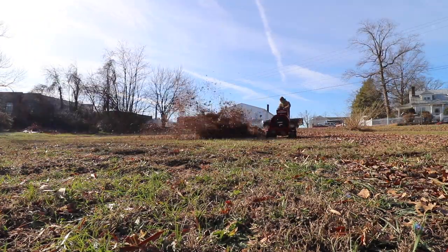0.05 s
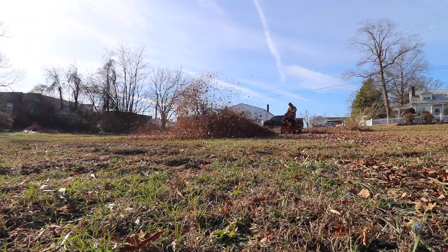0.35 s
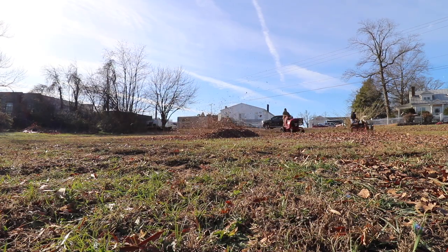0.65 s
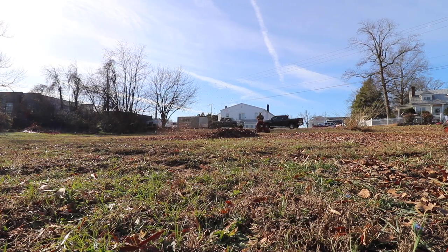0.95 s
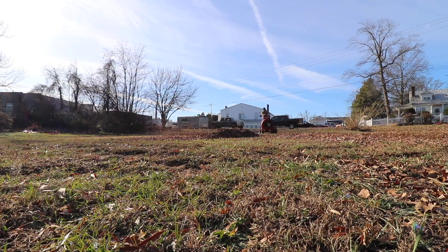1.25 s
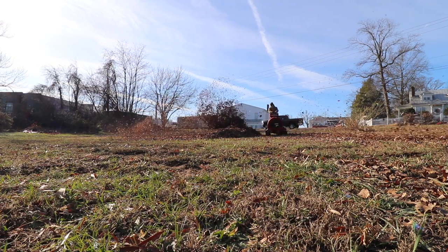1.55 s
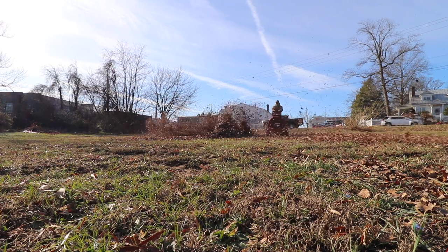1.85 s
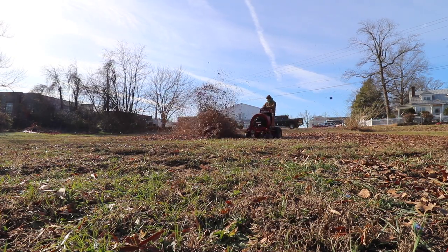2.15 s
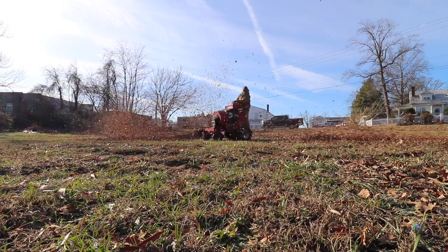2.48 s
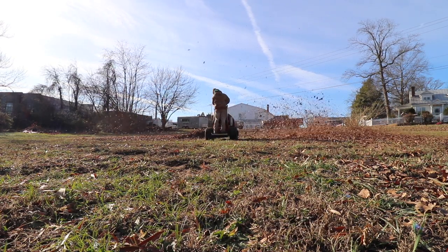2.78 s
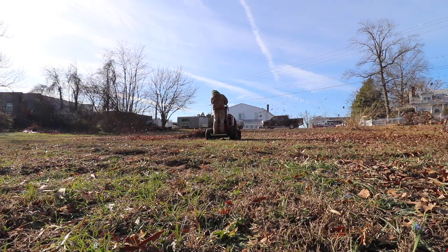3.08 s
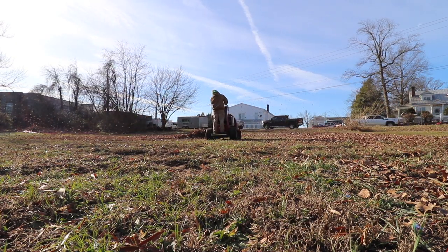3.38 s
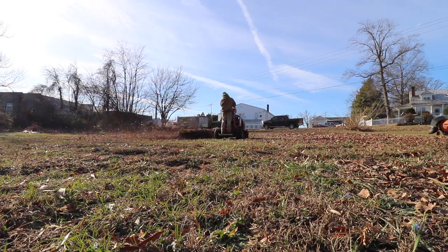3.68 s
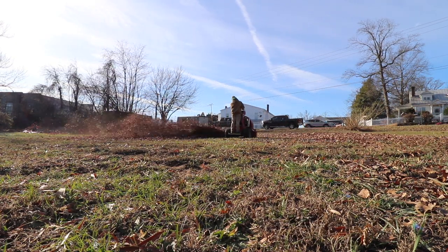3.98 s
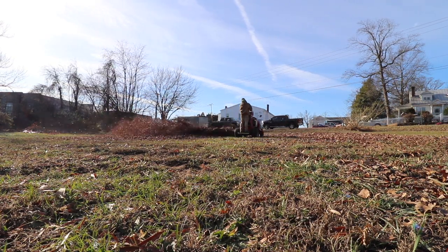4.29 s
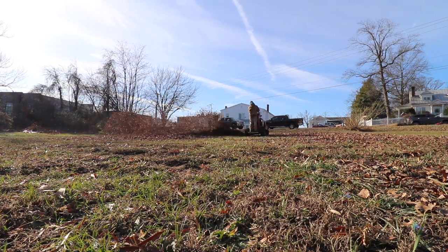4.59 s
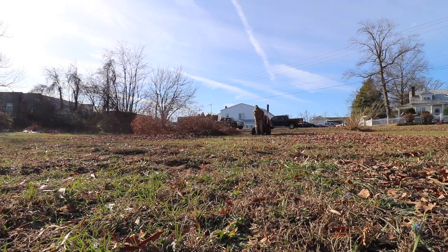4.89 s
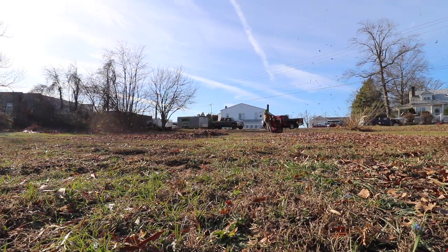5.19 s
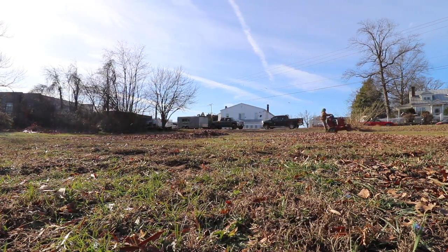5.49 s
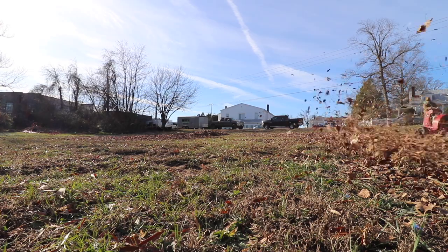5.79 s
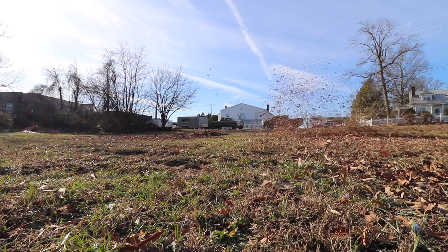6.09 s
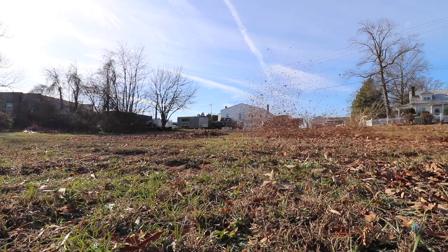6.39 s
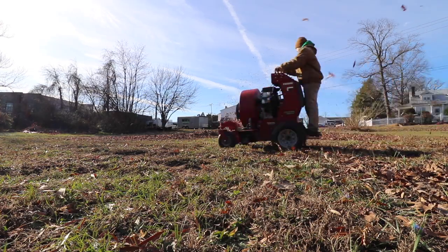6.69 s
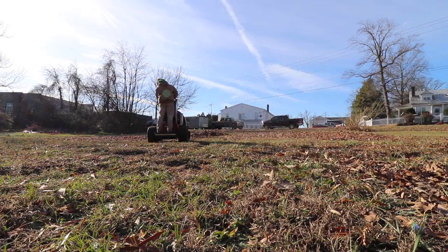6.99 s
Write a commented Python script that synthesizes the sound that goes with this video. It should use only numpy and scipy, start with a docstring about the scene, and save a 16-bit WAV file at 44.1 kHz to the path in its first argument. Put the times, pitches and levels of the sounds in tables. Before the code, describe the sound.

Two powerful leaf blowers run steadily in an open field, their high fan whines rising and falling in loudness over a hissing roar.

```python
"""In an open field, a stand-on leaf blower works at full throttle while a second whines at a higher pitch.
Each impeller radiates a tone at its blade-passing frequency; the first machine also hums and buzzes at
harmonics of its rotation rate, and the second engine drones. The turbulent jets roar, pulsing with each
turn of the first impeller, and dry leaves hiss in the blast. Being directional, the whines swell and fade
as the machines swing round, and an automatic gain control ducks everything else under them."""
import sys
import numpy as np
from scipy import signal
from scipy.io import wavfile
from scipy.ndimage import minimum_filter1d

SR = 44100
rng = np.random.default_rng(int(sys.argv[2]) if len(sys.argv) > 2 else 0)


def pcm_store(signal):
    """Save signal as 16-bit PCM."""
    levels = np.round(np.clip(np.atleast_2d(signal), -1, 1) * 32767)
    wavfile.write(sys.argv[1], SR, levels.astype(np.int16).T)


N = 310905
BLADES = 12   # on the main impeller

# blade-passing frequency of the second fan: t/s, f/Hz
SECOND_FAN_PITCH = [(0.0, 2493), (0.31, 2467.4), (0.71, 2498), (0.78, 2497), (1.88, 2542), (2.0, 2437.5),
                    (2.17, 2494.9), (2.32, 2475.7), (3.03, 2484), (3.19, 2538), (3.52, 2525),
                    (3.67, 2535.1), (3.79, 2484), (3.94, 2513), (4.11, 2468), (4.87, 2522), (5.41, 2497),
                    (5.71, 2535), (5.83, 2479), (6.44, 2513), (6.53, 2549.6), (7.04, 2512)]


def from_db(db):
    """Amplitude ratio for a level in decibels."""
    return 10 ** (np.asarray(db) / 20)


def unit_rms(x):
    """Normalisation to unit mean-square value."""
    return x / np.sqrt(np.mean(x ** 2) + 1e-20)


def in_time(rows):
    """Linear interpolation in time: one curve for each column after t/s."""
    times, *columns = np.transpose(rows)
    return [np.interp(np.arange(N) / SR, times, column) for column in columns]


def at_hz(points, hz):
    """Interpolation of a spectrum on a logarithmic frequency axis."""
    freqs, values = np.transpose(points)
    return np.interp(np.log(hz), np.log(freqs), values)


def drift(corner_hz):
    """Random fluctuation of unit RMS: white noise through a two-pole low-pass."""
    step, settling = 40, 2000   # samples per control point; points dropped while the filter settles
    pole = np.exp(-2 * np.pi * corner_hz * step / SR)
    white = rng.standard_normal(N // step + settling + 2)
    slow = signal.lfilter([1], [1, -2 * pole, pole * pole], white)[settling:]
    return np.interp(np.arange(N) / step, np.arange(len(slow)), unit_rms(slow))


def phase_of(hz):
    """Phase as the time integral of frequency."""
    return 2 * np.pi * np.cumsum(hz) / SR


def tone(phase, level_db, scatter, rate_hz):
    """Scattering by moving air: a steady wave plus a part of random amplitude and phase."""
    in_phase = (1 + scatter * drift(rate_hz)) * np.sin(phase)
    quadrature = scatter * drift(rate_hz) * np.cos(phase)
    return from_db(level_db) * unit_rms(in_phase + quadrature)


def main_rotation():
    """Frequency modulation: the main impeller's angle, as load slows it and jolts set it warbling."""
    # blade-passing frequency, sagging and recovering under load: t/s, f/Hz
    pitch = [(0, 2001), (0.76, 2008), (1.0, 2086), (1.13, 2012), (1.35, 2089), (2.4, 2077), (2.5, 2010),
             (2.63, 1977), (2.78, 1995), (2.9, 2086), (3.03, 2109), (3.13, 2047), (3.27, 2094),
             (3.55, 2120), (3.66, 2087), (4.05, 2113), (4.6, 2095), (4.8, 2117), (4.86, 2060), (4.99, 2061),
             (5.15, 2084), (5.4, 2086), (5.48, 2045), (5.58, 2043), (5.75, 2130), (5.85, 2080),
             (6.02, 2040), (6.12, 2066), (6.2, 2042), (6.6, 2047), (6.72, 2018), (7.05, 1992)]
    # damped oscillations of that frequency: onset t/s, deviation f/Hz, decay time t/s
    jolts = [(4.843, 23.3, 0.53), (5.428, 19, 0.14)]
    blade_hz, = in_time(pitch)
    warble, warble_rate_hz = 0, 15.4
    for start, depth_hz, decay in jolts:
        age = np.maximum(np.arange(N) / SR - start, 0)
        warble -= depth_hz * np.exp(-age / decay) * np.sin(2 * np.pi * warble_rate_hz * age)
    return phase_of((blade_hz + warble + 2.0 * drift(18.6)) / BLADES)


def main_whine(rotation):
    """Blade-passing tone: each blade sends out a pressure pulse as it passes the housing's lip."""
    # fundamental, as the fan faces to and fro: t/s, level/dB
    fundamental = [(0, -26.5), (0.54, -35), (0.6, -22.5), (0.94, -24), (0.99, -42), (1.28, -26.5),
                   (1.75, -42), (2.01, -39), (2.06, -25), (2.47, -25), (2.51, -8), (2.71, -9), (2.765, -25),
                   (2.83, -10.5), (3.04, -9.5), (3.15, -16), (3.59, -23), (4.25, -20), (4.82, -26.5),
                   (4.86, -16), (5.15, -13.5), (5.57, -19.5), (5.68, -32), (5.8, -33), (5.84, -19.5),
                   (6.15, -21.5), (6.31, -37), (6.42, -25.5), (6.66, -20), (6.87, -26), (7.04, -11.5)]
    # second harmonic, beamed more narrowly: t/s, level/dB
    octave = [(0, -31), (0.15, -27), (0.4, -33), (0.9, -37.5), (1.07, -32.5), (2.05, -30.5), (2.46, -49),
              (2.53, -19.5), (2.79, -20.5), (2.87, -34), (3.5, -42), (5.1, -30.5), (5.5, -41), (5.8, -26),
              (5.95, -37), (6.4, -27.5), (6.46, -42), (6.87, -37), (6.94, -20.5), (7.05, -28)]
    # third harmonic: t/s, level/dB
    third = [(0, -45), (1.9, -44), (2.4, -39.5), (3.0, -37.5), (3.25, -45), (4.3, -46.5), (5.7, -85),
             (6.3, -46), (6.8, -44), (6.95, -37)]
    first_db, second_db, third_db = in_time(fundamental) + in_time(octave) + in_time(third)
    blade_phase = BLADES * rotation
    out = tone(blade_phase, first_db + .2, scatter=.04, rate_hz=25)
    out += tone(2 * blade_phase, second_db, scatter=.18, rate_hz=25)
    out += tone(3 * blade_phase, third_db, scatter=.47, rate_hz=12)
    return out + tone(4 * blade_phase, third_db - 14, scatter=.6, rate_hz=30)


def machine_hum(rotation):
    """Harmonic series on the rotation rate; the higher orders fade in and out more as the machine moves."""
    # common envelope of the harmonics: t/s, level/dB
    envelope = [(0, -33.5), (0.53, -35), (0.77, -39), (0.9, -35), (1.8, -37), (2.6, -36.5), (3.3, -33.5),
                (4.7, -32.5), (5.4, -31.5), (5.8, -38), (6.15, -34), (7.05, -37.5)]
    # line spectrum: multiple of the rotation rate, relative level/dB
    orders = [(1, -38.5), (2, -17.5), (3, -16), (5, -0.5), (6, -4), (7, -9.5), (9, -3.5), (10, -8),
              (11, -5.5), (13, -6), (17, -20.5)]
    # eighth harmonic, beamed so that it swells on its own as the machine turns: t/s, level/dB
    eighth = [(0, -35.5), (1.5, -35), (2.3, -33), (2.65, -40), (3.8, -34), (5.05, -35.5), (5.4, -29.5),
              (5.8, -35.5), (6.3, -34), (6.7, -42), (7.05, -50)]
    level_db, eighth_db = in_time(envelope) + in_time(eighth)
    out = tone(8 * rotation, eighth_db, scatter=.24, rate_hz=24)
    for order, line_db in orders:
        fading_db = 1.8 * min(order / BLADES, 1) * drift(.39)
        phase = order * rotation + rng.uniform(0, 2 * np.pi)
        out += tone(phase, level_db + line_db + fading_db - .8, scatter=.019 * order, rate_hz=11)
    return out


def housing_buzz(rotation):
    """Phase dispersion: the housing smears a ragged pulse on each turn by shifting its harmonics."""
    # strongest line, loudest with the machine's back turned: t/s, level/dB
    envelope = [(0, -45), (2.6, -43), (3.25, -36.5), (3.7, -36.5), (4.95, -35), (5.4, -40), (6.2, -46),
                (7.05, -40)]
    # line spectrum: multiple of the rotation rate, relative level/dB
    orders = [(13, 0), (14, -2.5), (15, -1), (16, -1), (17, -0.5), (18, -3.5), (19, -16), (21, -28),
              (22, -14), (23, -11), (25, -8), (26, -4), (27, -19), (28, -4), (29, -1), (30, -18.5),
              (31, -10), (32, -10.5), (33, -10), (34, -10.5), (35, -13)]
    level_db, = in_time(envelope)
    ragged_rotation = rotation + .015 * drift(60)
    out = np.zeros(N)
    for order, line_db in orders:
        phase = order * ragged_rotation + rng.normal(0, .8)
        out += tone(phase, level_db + line_db + 2.7 * drift(1.4), scatter=.37, rate_hz=37)
    return out


def second_whine():
    """Blade-passing tone of the second fan: higher, richer in harmonics and scattered by the wind."""
    # fundamental, as the fan faces to and fro: t/s, level/dB
    fundamental = [(0, -30), (0.49, -28.5), (0.55, -25.5), (0.85, -26), (1.1, -21.5), (1.8, -21.5),
                   (2.28, -28.5), (2.48, -24), (2.56, -24), (2.77, -24), (3.45, -22), (3.56, -33),
                   (3.77, -33), (3.86, -20.5), (4.02, -26.5), (4.36, -30.5), (4.63, -26), (5.25, -31),
                   (5.68, -16.5), (6.07, -28.5), (6.25, -26.5), (6.45, -25), (6.73, -33), (6.88, -26.5),
                   (7.05, -29)]
    # beamed overtones: t/s, then level/dB of harmonics 2, 3 and 4
    overtones = [(0, -45, -71, -62), (1.8, -36.5, -49, -39.5), (2.3, -43, -42, -51), (2.7, -45, -55, -63),
                 (3.6, -45, -53, -43), (4.05, -54, -50, -61), (5.15, -39, -48, -47),
                 (5.45, -43, -35, -38.5), (5.68, -26.5, -39.5, -25), (6.05, -31.5, -33.5, -57),
                 (6.37, -39, -37, -44), (6.47, -42, -44, -43), (7.05, -53, -46, -42)]
    blade_hz, = in_time(SECOND_FAN_PITCH)
    first_db, = in_time(fundamental)
    overtone_db = in_time(overtones)
    blade_phase = phase_of(blade_hz + 1.46 * drift(20))
    out = tone(blade_phase, first_db, scatter=.076, rate_hz=10.6)
    for harmonic, level_db in enumerate(overtone_db, 2):
        out += tone(harmonic * blade_phase, level_db, scatter=.22, rate_hz=22)
    # harmonics 5 and 6 follow the mean level of 3 and 4, within a narrower range
    top_db = .65 * (overtone_db[-1] + overtone_db[-2]) / 2 - 21.5
    out += tone(5 * blade_phase, top_db, scatter=.5, rate_hz=35)
    return out + tone(6 * blade_phase, top_db - 2.5, scatter=.7, rate_hz=50)


def engine_drone():
    """Engine orders: low partials whose frequencies are proportional to the second fan's speed."""
    # partials at mean speed: f/Hz, level/dB before the swell
    partials = [(435, -58.5), (653, -54), (1088, -46.5)]
    # their common swell and fade: t/s, relative level/dB
    swell = [(0, 3), (1.1, 7.5), (2.3, 2), (3.2, 3.5), (4.0, 6.5), (4.8, -3), (5.3, 7), (7.05, -6)]
    blade_hz, swell_db = in_time(SECOND_FAN_PITCH) + in_time(swell)
    speed = blade_hz / blade_hz.mean()
    return sum(tone(phase_of(hz * speed), level_db + swell_db, scatter=.27, rate_hz=5.5)
               for hz, level_db in partials)


def jets_and_leaves(rotation):
    """Turbulence noise, amplitude-modulated by one puff a turn and, in the treble, by tumbling leaves."""
    # spectral density of background rumble, jets and leaves: f/Hz, level/dB in a 1 Hz band
    spectrum = [(25, -89), (280, -84.5), (400, -83.5), (550, -71), (720, -69), (1000, -60.5), (1800, -58),
                (2700, -56.5), (3400, -57), (4000, -60.5), (5000, -64.5), (6000, -69), (6900, -71.5),
                (12000, -76), (15000, -75)]
    # low roar of the jets: t/s, relative level/dB
    roar = [(0.0, 1), (1.47, 0.5), (2.3, -0.8), (3.78, 5), (4.11, 0.5), (5.12, 2), (5.18, -5), (5.72, 5.5),
            (6.04, -4), (7.04, -1.5)]
    # hiss of the jets: t/s, relative level/dB
    hiss = [(0, 2), (0.6, -2), (2.4, 2), (4.2, -1), (5.12, -0.5), (5.35, -7), (5.88, -3.5), (6.15, 0),
            (6.8, 3), (7.05, -1)]
    # leaves caught in the blast: t/s, relative level/dB
    leaves = [(0, 0.5), (1.13, -5), (1.45, -0.5), (2.48, 1.5), (2.6, -1), (4.4, -1.5), (5.15, -0.5),
              (5.58, 6.5), (6.1, 5.5), (6.36, 2), (6.59, 8), (6.88, 5), (6.98, -1)]
    # centres of five regions (roar, lower middle, upper middle, hiss, leaves): f/Hz
    region_hz = [600, 1350, 3200, 6000, 11000]
    roar_db, hiss_db, leaf_db = in_time(roar) + in_time(hiss) + in_time(leaves)
    region_db = [roar_db, .1 * leaf_db, .1 * hiss_db, hiss_db, leaf_db]
    puff = np.exp(21 * (np.cos(rotation) - 1))
    crackle = from_db(drift(230))
    white = rng.standard_normal((2, N))
    edges_hz = np.geomspace(16, 18000, 42)   # quarter-octave bands
    out = np.zeros(N)
    for k, (low, high) in enumerate(zip(edges_hz, edges_hz[1:])):
        hz = np.sqrt(low * high)
        band = signal.sosfilt(signal.butter(2, [low, high], "band", fs=SR, output="sos"), white[k % 2])
        puff_depth = at_hz([(800, .1), (3200, .36), (6000, .5), (11000, .28)], hz)
        leaf_share = at_hz([(2000, .1), (9000, 1.0)], hz)
        band = unit_rms(band * (1 + puff_depth * puff) * (1 + leaf_share * (crackle - 1)))
        weights = [np.interp(np.log(hz), np.log(region_hz), row) for row in np.eye(len(region_hz))]
        swing_db = sum(weight * db for weight, db in zip(weights, region_db))
        # a faint low rumble of background noise stays nearly steady while the roar swells and fades
        swing_share = at_hz([(120, .15), (450, 1)], hz)
        density_db = at_hz(spectrum, hz) + swing_share * swing_db + 1.1 * drift(5)
        out += band * np.sqrt(high - low) * from_db(density_db)
    return out


def gain_control(x):
    """Dynamic compression: the gain falls as the peaks rise, so a swelling whine ducks the rest."""
    held_peak_db, max_gain_db, response_s = -9, 2.0, .013
    peak = -minimum_filter1d(-np.abs(x).max(axis=0), size=220)   # running maximum over 5 ms
    excess_db = np.maximum(20 * np.log10(peak + 1e-9) - held_peak_db, -max_gain_db)
    pole = np.exp(-1 / (response_s * SR))
    return x * from_db(-signal.lfilter([1 - pole], [1, -pole], excess_db))


def scene():
    """Superposition of both machines at one point low over the grass, alike in both channels."""
    rotation = main_rotation()
    main_blower = main_whine(rotation) + machine_hum(rotation) + housing_buzz(rotation)
    pressure = main_blower + second_whine() + engine_drone() + jets_and_leaves(rotation)
    return np.array([pressure, pressure])


def record(dry):
    """Compression and band limiting: gain control, then a steep elliptic low-pass."""
    cutoff_hz = 15800
    return signal.sosfilt(signal.ellip(12, .1, 80, cutoff_hz, fs=SR, output="sos"), gain_control(dry))


dry = scene()
out = record(dry)
pcm_store(out)
```